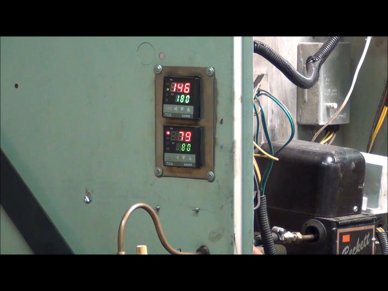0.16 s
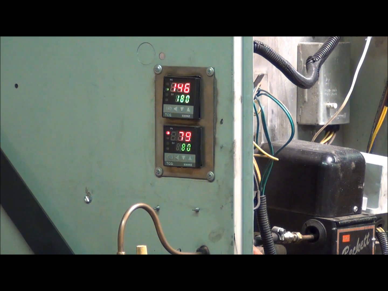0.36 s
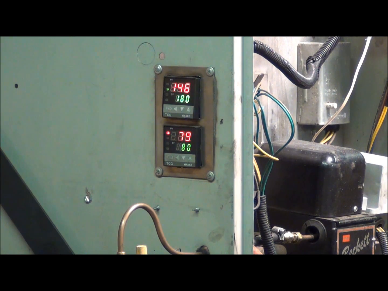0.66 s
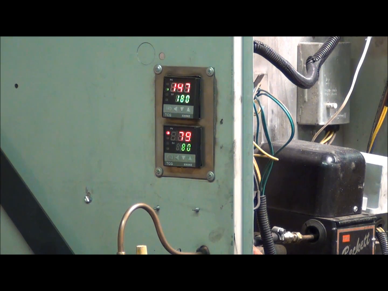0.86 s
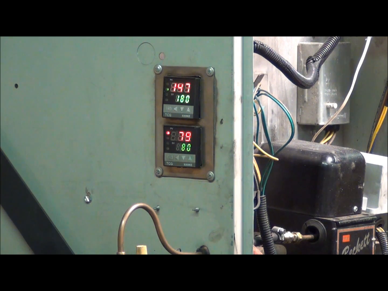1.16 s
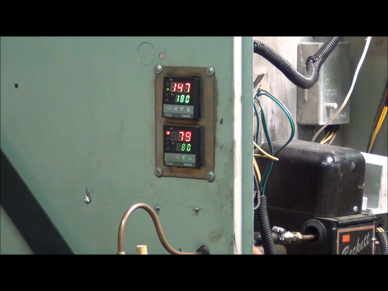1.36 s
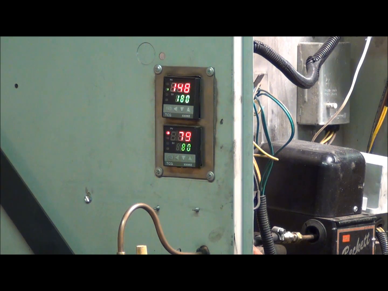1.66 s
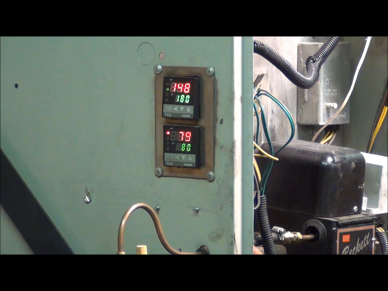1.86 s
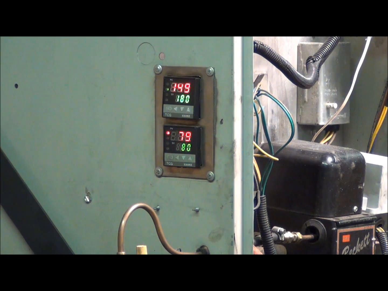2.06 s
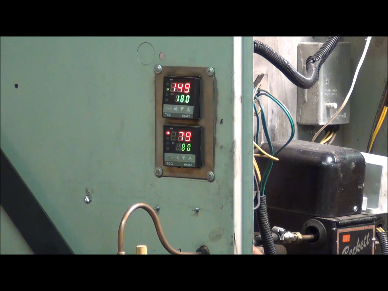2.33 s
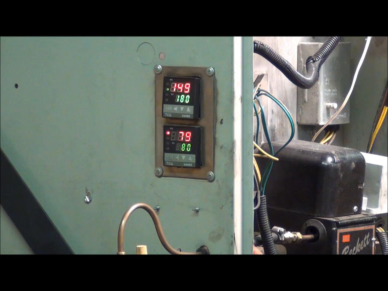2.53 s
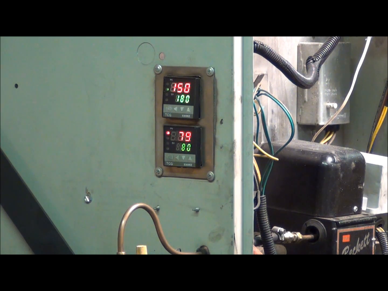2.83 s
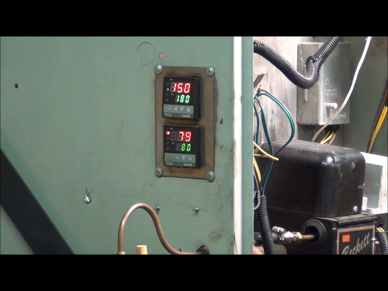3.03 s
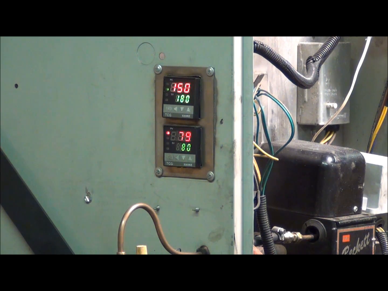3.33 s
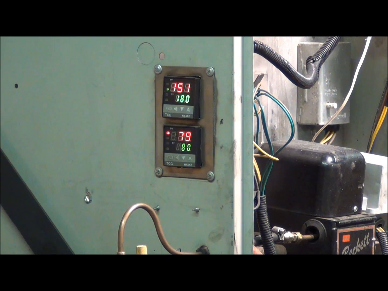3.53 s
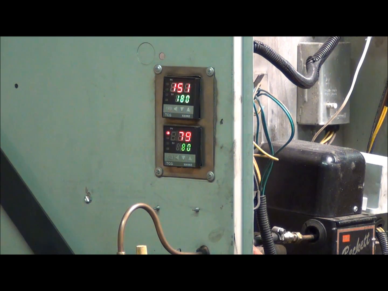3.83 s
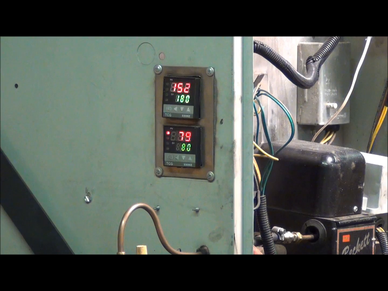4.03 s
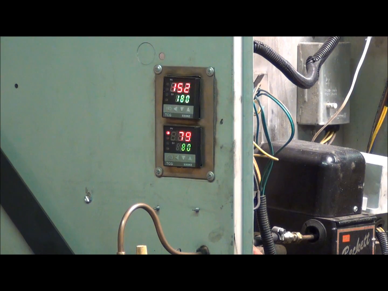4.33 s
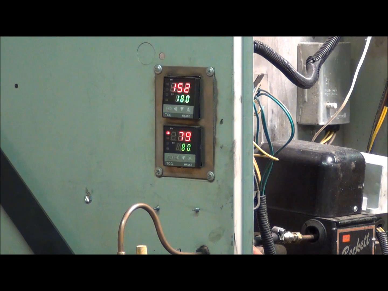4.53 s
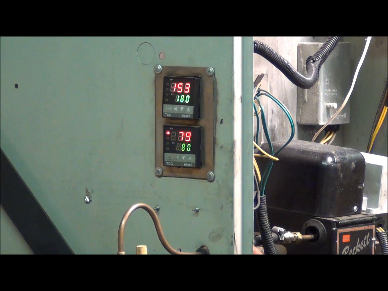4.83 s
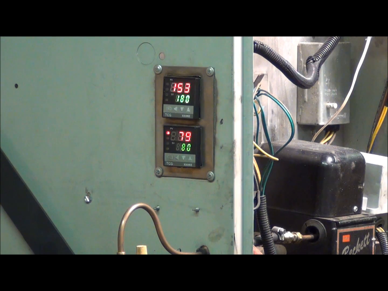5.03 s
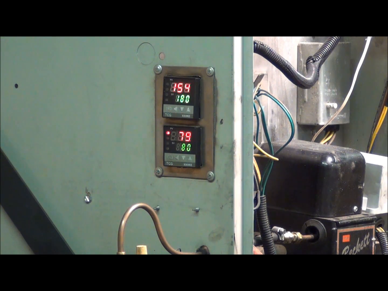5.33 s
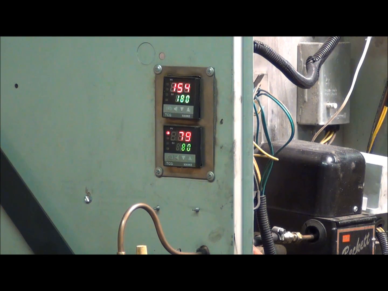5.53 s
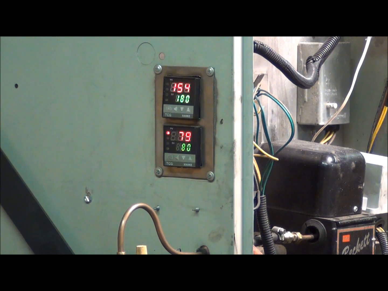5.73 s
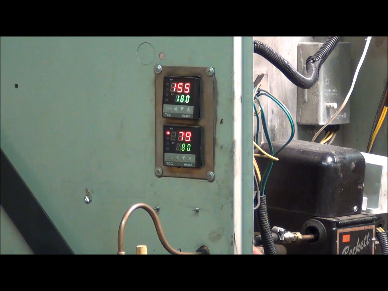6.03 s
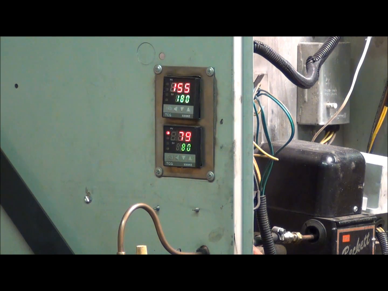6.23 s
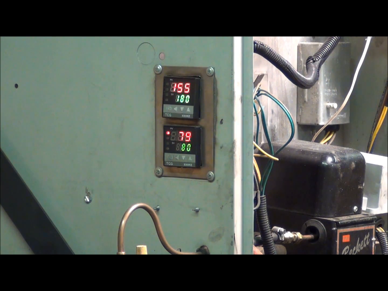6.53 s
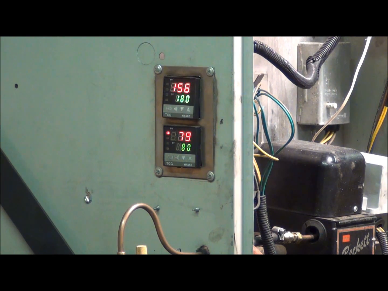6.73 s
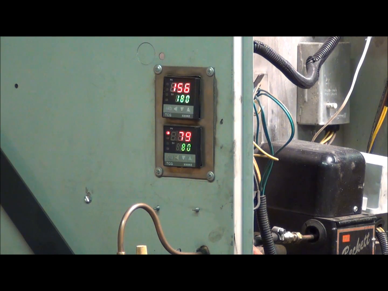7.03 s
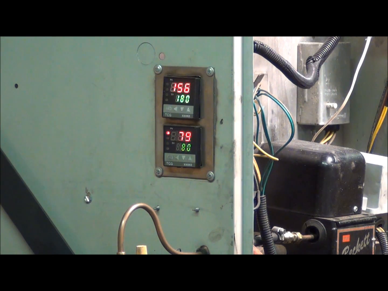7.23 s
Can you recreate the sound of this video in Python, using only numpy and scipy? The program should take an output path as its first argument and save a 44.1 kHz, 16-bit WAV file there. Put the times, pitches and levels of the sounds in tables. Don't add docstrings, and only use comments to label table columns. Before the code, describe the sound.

From 0 to about 7.4 seconds a steady 60-cycle electrical buzz runs without pause in a moderately reverberant workshop. The transformer gives a low hum with strong overtones, while loose sheet steel adds a fine, raspy, high metallic rattle, spread slightly left and right and shifting subtly. Under it a pump motor hums near 255 hertz, swelling and sagging, with faint machine tones, a very thin high whine, soft air hiss and tiny crackling spark ticks. At about 3.66 seconds a relay snaps: a bright, hard, rapid cluster of clicks, followed immediately by a short ring from its jolted metal cabinet. At about 5.75 seconds something dull is set down further off, a woody low-mid thud with small settling knocks until roughly 6.0, and room echo. Faint deep traffic rumble rises around then. The buzz continues unchanged to the end, with no ignition roar or blower.

```python
import sys
import numpy as np
from scipy import signal
from scipy.fft import rfft, irfft
from scipy.io import wavfile
from scipy.ndimage import map_coordinates

SR = 44100
rng = np.random.default_rng(int(sys.argv[2]) if len(sys.argv) > 2 else 0)


def file_out(sig):
    cols = np.atleast_2d(sig).T
    lim = np.clip(cols, -1, 1)
    pcm = np.round(lim * 32767).astype(np.int16)
    wavfile.write(sys.argv[1], SR, pcm)


def rack_gain(trim_db):
    fader = np.asarray(trim_db, float)
    return 10 ** (fader / 20)


N = 325458

# t/s, level/dB
RUMBLE_LEVEL = [(0, -70), (3, -72), (4.5, -67), (5.7, -57), (6.7, -59), (7.4, -57)]
# f/Hz, level/dB per Hz
RUMBLE_COLOUR = [(15, -30), (30, -8), (50, 2), (90, -23)]
# f/Hz, level/dB per Hz
AIR_MID = [(20, -99), (30, -81), (45, -84), (80, -79.5), (140, -77.5), (250, -76), (450, -77.5), (800, -79),
           (1300, -79.5), (2000, -86), (3200, -85.5), (4800, -89.5), (7500, -88.5), (15500, -90)]
# f/Hz, level/dB per Hz
AIR_SIDE = [(30, -111), (80, -100), (140, -91.5), (250, -84.5), (800, -81.5), (1300, -84), (2000, -88.5),
            (3200, -87.5), (4800, -94), (6000, -86), (7500, -108), (10000, -101.5), (15500, -103)]
RATTLE_HZ, RATTLE_WIDTH_HZ, RATTLE_DB = 5740, 900, -79
# f/Hz, level/dB, wobble/dB, left minus right/dB
TONES = [(145.3, -67, 2, 0), (211, -64, 3, 0), (345, -66, 2, 0), (292.5, -61, 2, 0), (323, -63.5, 2, 0),
         (370.1, -63, 2, 0), (542.4, -67, 2, 0), (554.5, -64, 2, 0), (1008, -65, 2.5, -1),
         (1849, -70, 2.5, 0), (2802, -67, 2, 0), (4094, -69, 2, 0), (5967, -70, 2.5, 0),
         (15734, -67.5, .3, 0)]
# t/s, f/Hz, level/dB
MOTOR_LOAD = [(0.0, 256.4, -67), (0.9, 254.6, -52.5), (2.18, 254.6, -54.5), (2.65, 253.8, -50.5),
              (3.04, 252, -60), (3.37, 256.7, -51), (4.21, 252, -59), (4.36, 258, -51), (4.4, 254.5, -59),
              (4.71, 256, -49.5), (5.51, 254, -59), (6.58, 256, -51.5), (6.88, 254.7, -61),
              (7.38, 251, -52)]
# share of a mains cycle, peak level/dB
SPARKS = [(.337, -56), (.398, -55), (.837, -49), (.898, -44)]
# f/Hz, time to fall 60 dB/s
SHOP_T60 = [(200, 1), (1000, 1), (4000, 1), (10000, 0.57), (15000, .55)]
# t/s, level/dB
THUD_HITS = [
    (5.752, -16),
    (5.763, 1),
    (5.767, 3),
    (5.775, 0),
    (5.783, -4),
    (5.80, -6),
    (5.83, -6),
    (5.87, -4),
    (5.943, 0),
    (6.0, -10),
]
# f/Hz, width/Hz, level/dB
THUD_BODY = [(205, 45, 14.5), (275, 41, -8), (350, 68, 7.5), (546, 205, 7), (958, 340, 3), (1450, 500, 6),
             (2100, 590, 5.5), (2920, 1100, 4), (3760, 730, 2)]
# t/s, level/dB
CABINET_HITS = [(3.674, -2), (3.69, 0), (3.71, -4), (3.73, -6)]
# f/Hz, width/Hz, level/dB
CABINET_BODY = [(300, 50, 7), (430, 60, 8), (627, 28, 9), (700, 40, -5), (810, 40, 9), (1640, 50, 8)]
# t/s, level/dB
RELAY_HITS = [
    (3.6557, 0),
    (3.658, 1),
    (3.660, 2),
    (3.6625, 2),
    (3.666, 0),
    (3.669, -2),
    (3.6745, -5),
    (3.679, -9),
]
# f/Hz, width/Hz, level/dB
RELAY_BODY = [(1580, 440, 2), (2280, 1150, -0.5), (3240, 1050, 2), (4220, 1100, 0.5), (6300, 1100, -4),
              (8300, 1100, -0.5), (10500, 730, -2), (12700, 1400, -6.5), (13900, 430, 0.5),
              (14600, 570, -4)]
# t/s, f/Hz
MAINS = [(0, 60.0), (2, 60.0), (2.5, 60.004), (4.5, 60.006), (7.4, 60.005)]
MAINS_HZ = MAINS[0][1]
# multiple of mains, level/dB
CORE = [(1, -63.6), (2, -49.6), (3, -47.2), (4, -56.0), (5, -62.1), (6, -52.9), (7, -50.3), (8, -50.1),
        (9, -61.1), (10, -52.2), (11, -69.4), (12, -49.4), (13, -71.3), (14, -53.3), (15, -75.4),
        (16, -61.1)]
CORE_LEFT_DB_PER_KHZ = 1.5
TWICE_BELOW_HZ, EVEN_DB, ODD_DROP_DB = 3300, -65.4, 11.2
# f/Hz, width/Hz, level on top/dB,
# left minus right/dB
STEEL_MODES = [(1052, 28, -47.9, 4), (1199, 16, -60.1, 4), (1302, 15, -42.3, -11), (1615, 76, -56.0, 1),
               (1969, 15, -42.7, -4), (2196, 97, -55.8, 5), (2399, 41, -54.1, -7), (2687, 202, -57.6, 1),
               (2920, 16, -50.0, 5), (3062, 15, -52.8, 2), (3738, 15, -46.6, -3), (4230, 83, -61.3, 2),
               (4567, 15, -54.8, -4), (4678, 15, -58.7, -2),
               (4800, 15, -54.7, 0), (5339, 62, -63.1, 0), (5620, 15, -45.2, -2), (5897, 69, -50.4, 1),
               (6051, 91, -52.9, 1), (6212, 15, -41.4, -2), (6360, 15, -57.7, 5), (6465, 15, -53.3, 10),
               (6813, 15, -55.2, 3), (6992, 15, -53.0, -3), (7788, 146, -65.7, 3), (8187, 15, -55.9, 2),
               (8416, 26, -54.3, -2)]
# f/Hz, level/dB
BUZZ_WEAK = [(900, -68.5), (3000, -84), (5000, -72), (7000, -74), (7500, -78), (8200, -78), (9300, -75),
             (10500, -83), (12000, -81.5), (13000, -88)]
# heard from f/Hz up, share of a cycle, strength (minus = inward)
BLOWS = [(120, 0.0046, -1.0), (120, 0.2444, -0.3), (120, 0.4046, 0.6), (120, 0.5563, 0.7),
         (1500, 0.0761, 0.4), (1500, 0.1715, 0.8), (1500, 0.656, 0.9), (3600, 0.1669, -0.5),
         (3600, 0.6573, -0.4), (3600, 0.8984, -0.6), (5400, 0.0266, 0.7), (5400, 0.6113, -0.5),
         (5400, 0.7563, -0.4)]
# f/Hz, phase/rad
SMEAR = [(1400, .2), (1600, .9), (5300, .6), (5500, .3), (6700, .3), (6900, 3)]
# f/Hz, phase/rad
PORT_SCATTER = [(300, 0.09), (1000, 0.16), (3000, 0.51), (7000, 1)]
# f/Hz, fall/dB
SETTLING = [(1500, 0.5), (2400, 1), (3500, -0.5), (6000, 0), (8000, 2), (12000, -1)]
SIDE = np.array([[1], [-1]])


def in_hz(points, hz):
    points = np.array(points)
    return np.interp(np.log(np.maximum(hz, 1)), np.log(points[:, 0]), points[:, 1])


def drift(rate, count):
    knots = rng.standard_normal((count, 200))
    place = np.arange(N) / SR * rate
    return np.array([np.interp(place, np.arange(200), k) for k in knots]) * 1.22


def coloured(spectrum):
    hz = np.arange(N // 2 + 1) * SR / N
    white = rfft(rng.standard_normal(N))
    return irfft(white * rack_gain(in_hz(spectrum, hz)) * np.sqrt(SR / 2), N)


def resonate(x, hz, width_hz):
    r = np.exp(-np.pi * width_hz / SR)
    poles = [1, -2 * r * np.cos(2 * np.pi * hz / SR), r * r]
    return signal.lfilter([(1 - r * r) / 2, 0, (r * r - 1) / 2], poles, x)


def rumble():
    low = coloured(RUMBLE_COLOUR)
    return low / low.std() * rack_gain(np.interp(np.arange(N) / SR, *np.transpose(RUMBLE_LEVEL)))


def air(cycle):
    rattle = rng.standard_normal(N)
    for _ in range(2):
        rattle = resonate(rattle, RATTLE_HZ, RATTLE_WIDTH_HZ * 2)
    rattle = rattle / rattle.std() * rack_gain(RATTLE_DB + 1.5 * np.cos(4 * np.pi * cycle))
    return coloured(AIR_MID) + rattle + coloured(AIR_SIDE) * SIDE


def tones():
    out, t = 0, np.arange(N) / SR
    levels = drift(7.0, count=len(TONES))
    slips = drift(2.3, count=len(TONES))
    for (hz, db, wobble_db, left_db), level, slip in zip(TONES, levels, slips):
        wave = np.sqrt(2) * np.sin(2 * np.pi * hz * t + wobble_db * slip)
        out = out + rack_gain(db + wobble_db * level) * wave * rack_gain(left_db / 2 * SIDE)
    return out


def motor():
    s, hz, db = np.transpose(MOTOR_LOAD)
    t = np.arange(N) / SR
    turns = np.cumsum(np.interp(t, s, hz)) / SR
    return np.sqrt(2) * rack_gain(np.interp(t, s, db)) * np.sin(2 * np.pi * turns)


def sparks(cycle, length_s):
    gate = 0
    for at, db in SPARKS:
        away_s = ((cycle - at + 0.5) % 1 - 0.5) / MAINS_HZ
        gate = gate + rack_gain(db) * np.exp(-(away_s / length_s) ** 2)
    bright = signal.butter(2, 7500, "high", fs=SR, output="sos")
    return signal.sosfilt(bright, gate * rng.standard_normal(N))


def shop(direct_db, early_t60, tail_db, spread):
    t = np.arange(SR) / SR
    mid, side = rng.standard_normal((2, SR))
    noise = mid + spread * side * SIDE
    tail = 0
    for low in 100 * 2 ** np.arange(8):
        band = signal.butter(2, [low, min(low * 2, 20000)], "band", fs=SR, output="sos")
        fade = rack_gain(-60 * t / in_hz(SHOP_T60, low * np.sqrt(2)))
        tail = tail + signal.sosfilt(band, noise) * fade
    early = noise * rack_gain(-60 * t / early_t60)
    return rack_gain(direct_db) * (t == 0) + early + rack_gain(tail_db) * tail * (1 - np.exp(-t / 0.0011))


def knock(hits, body, level_db, scuff_s, room):
    start = round(hits[0][0] * SR) - 200
    t = (start + np.arange(SR // 2)) / SR
    touch = sum(rack_gain(db) * (t >= s) * np.exp(-np.abs(t - s) / scuff_s) for s, db in hits)
    contact = rack_gain(level_db) * touch * rng.standard_normal(SR // 2) / np.sqrt(scuff_s * SR / 2)
    ring = 0
    for k, (hz, width_hz, db) in enumerate(body):
        ring = ring + rack_gain(db) * resonate(contact, hz, width_hz) * (-1) ** k
    out = np.zeros((2, N + 2 * SR))
    out[:, start:start + SR] = signal.fftconvolve(ring[None], room)[:, :SR]
    return out[:, :N]


def thud():
    room = shop(direct_db=23.5, early_t60=0.065, tail_db=-4.5, spread=0.22)
    return knock(THUD_HITS, THUD_BODY, -35, 0.0068, room)


def cabinet():
    room = shop(direct_db=28, early_t60=0.05, tail_db=-10, spread=0.27)
    return knock(CABINET_HITS, CABINET_BODY, -35, 0.004, room)


def relay():
    room = shop(direct_db=28, early_t60=0.03, tail_db=-3, spread=0.37)
    return knock(RELAY_HITS, RELAY_BODY, -30, 0.0017, room)


def ports(left_db):
    return rack_gain(left_db * SIDE) / np.cosh(left_db * np.log(10) / 20)


def overtones(order, weak_db, pan_db):
    hz = order * MAINS_HZ
    twice, even = hz < TWICE_BELOW_HZ, order % 2 == 0
    power = np.where(twice & even, rack_gain(2 * EVEN_DB), rack_gain(2 * weak_db) * ports(pan_db))
    for centre_hz, width_hz, db, left_db in STEEL_MODES:
        near = 1 / (1 + (2 * (hz - centre_hz) / width_hz) ** 2)
        power = power + near * rack_gain(2 * (db - ODD_DROP_DB * (twice & ~even))) * ports(left_db)
    core_left_db = CORE_LEFT_DB_PER_KHZ * hz[:len(CORE)] / 1000
    power[:, :len(CORE)] = rack_gain(2 * np.array(CORE)[:, 1]) * ports(core_left_db)
    return power


def buzz(cycle, scatter_db, pan_scatter_db, wander_db):
    order = np.arange(1, 217)
    hz, draw = order * MAINS_HZ, rng.standard_normal((4, 216))
    weak_db = in_hz(BUZZ_WEAK, hz) + scatter_db * np.clip(draw[0], -3, 1)
    power = overtones(order, weak_db, pan_db=pan_scatter_db * np.clip(draw[1], -2, 2))
    from_hz, at, strength = np.transpose(BLOWS)
    panels = np.unique(from_hz)
    panel = panels[np.maximum(np.searchsorted(panels, hz, "right") - 1, 0)]
    turn = np.exp(-2j * np.pi * np.outer(order, at))
    knocks = (strength * turn * (panel[:, None] == from_hz)).sum(axis=1)
    phase = np.angle(knocks) + in_hz(SMEAR, hz) * draw[2]
    disagree = np.where(power.mean(axis=0) > rack_gain(-120), 0.3, 1.5)
    apart = in_hz(PORT_SCATTER, hz) * draw[3] * disagree
    lines = np.sqrt(power) * np.exp(1j * (phase + apart * SIDE / 2))
    wander = rack_gain(wander_db * rng.standard_normal((12, 216)) * np.minimum(hz / 3000 + 0.54, 1))
    wander = wander * rack_gain(np.outer(np.linspace(0.5, -0.5, 12), in_hz(SETTLING, hz)))
    place = [np.linspace(0, 11, N), cycle % 1 * 4096]
    out = []
    for port in lines:
        cycles = irfft(np.pad(port * wander, ((0, 0), (1, 0))), 4096) * 4096 / np.sqrt(2)
        closed = np.column_stack([cycles, cycles[:, 0]])
        out.append(map_coordinates(closed, place, order=1))
    return np.array(out)


def scene():
    cycle = np.cumsum(np.interp(np.arange(N) / SR, *np.transpose(MAINS))) / SR
    background = rumble() + air(cycle) + tones() + motor() + sparks(cycle, length_s=0.00015)
    knocks = thud() + cabinet() + relay()
    return background + knocks + buzz(cycle, scatter_db=11.0, pan_scatter_db=17.0, wander_db=1.28)


def low_pass(x):
    return signal.sosfilt(signal.butter(12, 16380, fs=SR, output="sos"), x)


def record(dry):
    kept = np.arange(N // 2 + 1) * SR / N < 15765
    mix = irfft(rfft(dry) * kept, N)
    return low_pass(mix)


dry = scene()
out = record(dry)
file_out(out)
```